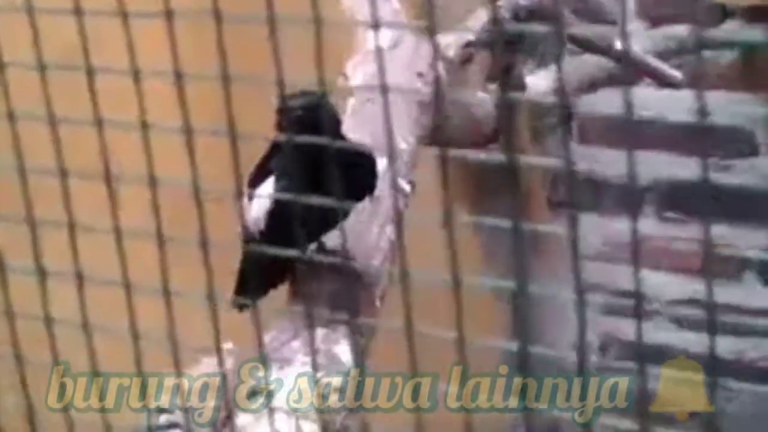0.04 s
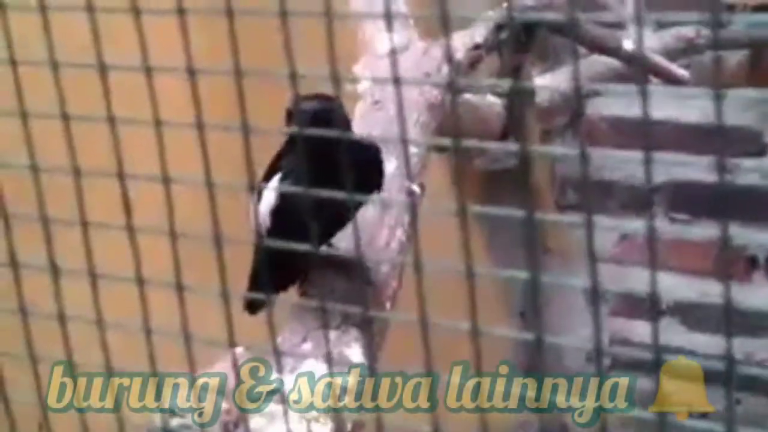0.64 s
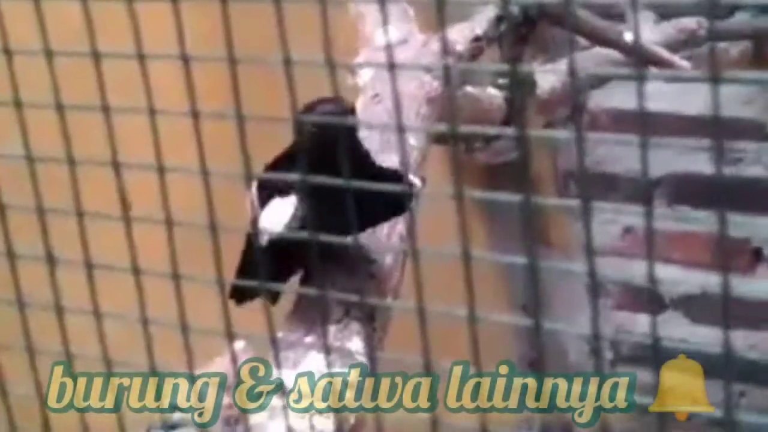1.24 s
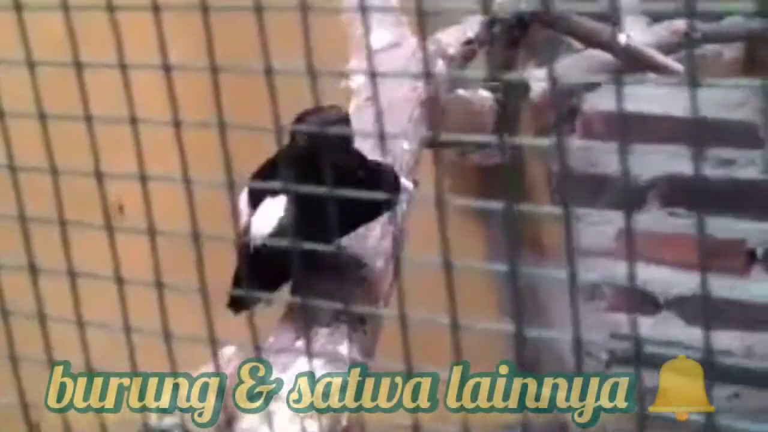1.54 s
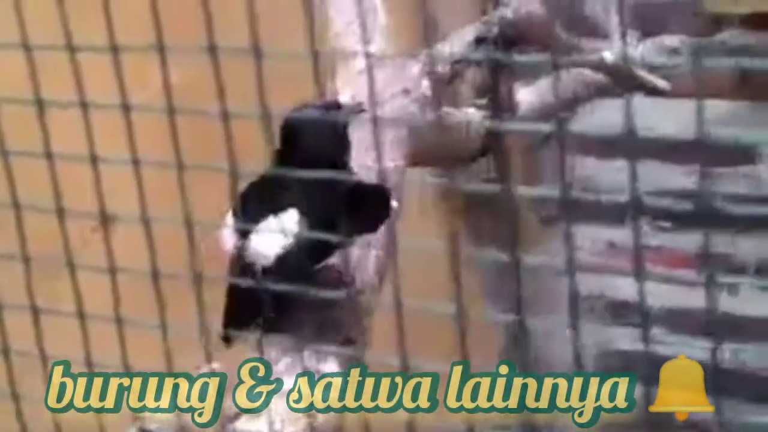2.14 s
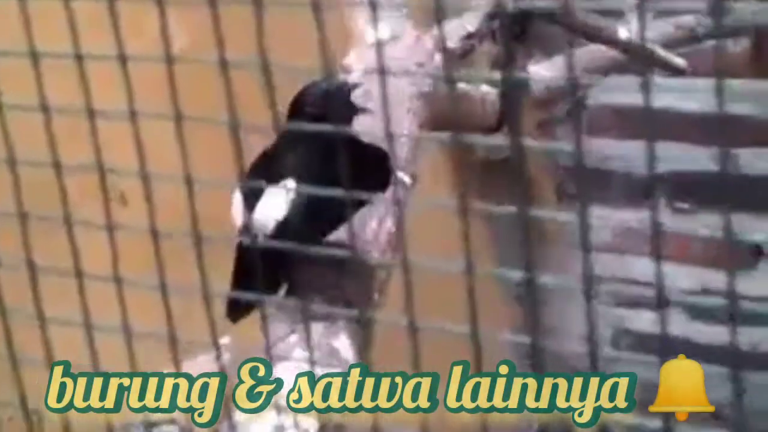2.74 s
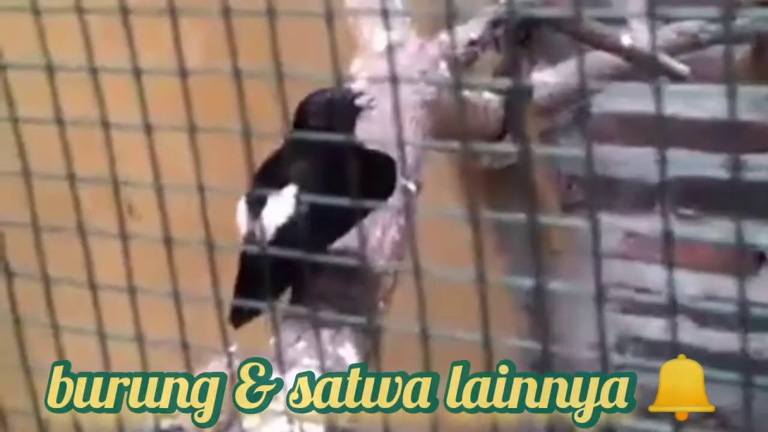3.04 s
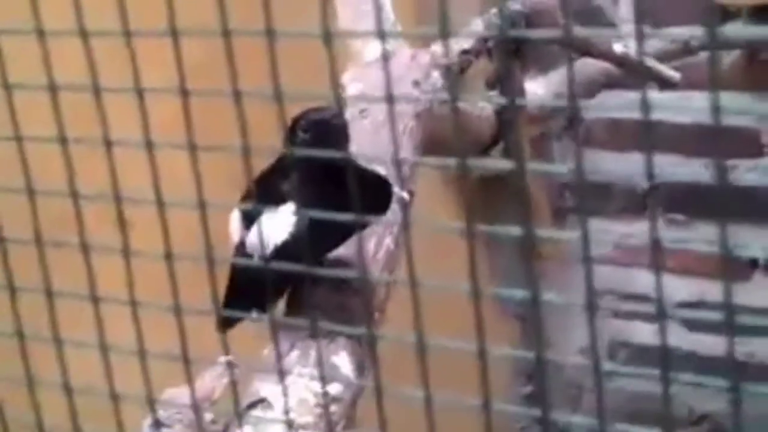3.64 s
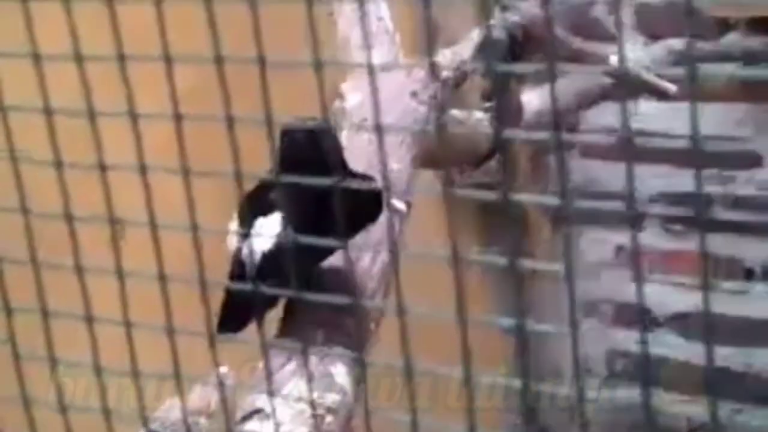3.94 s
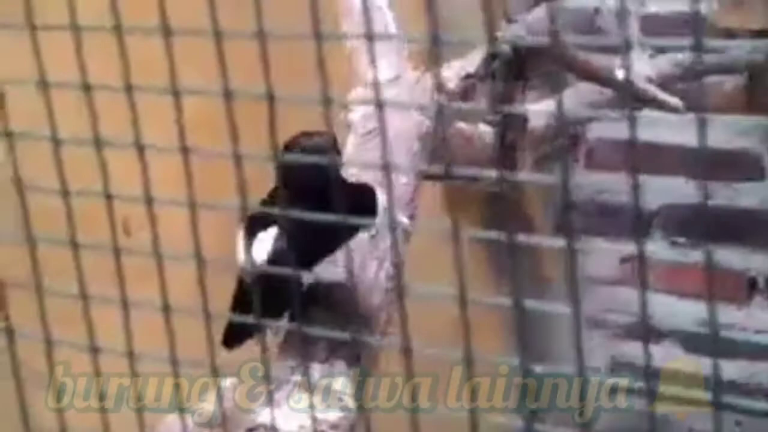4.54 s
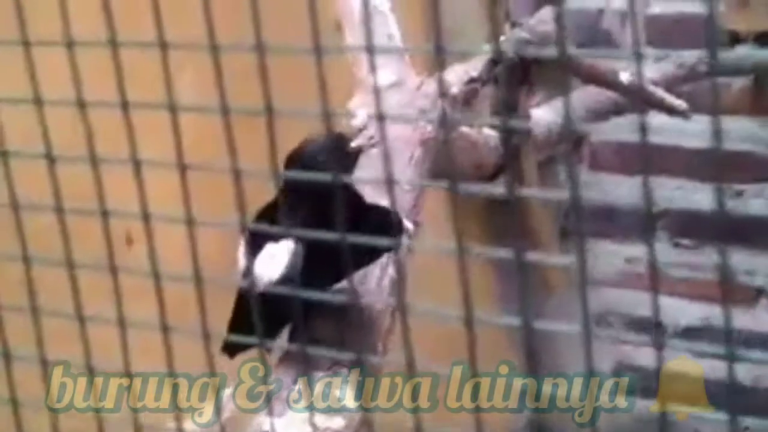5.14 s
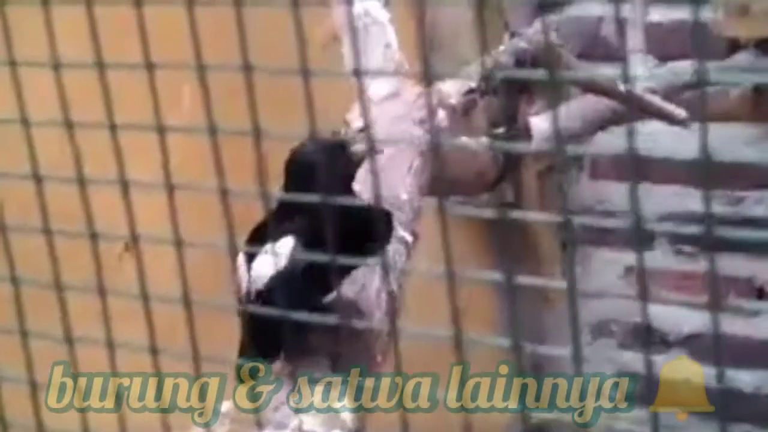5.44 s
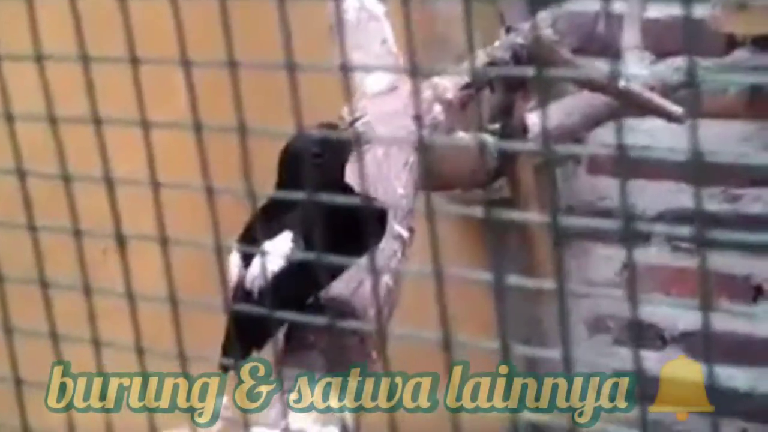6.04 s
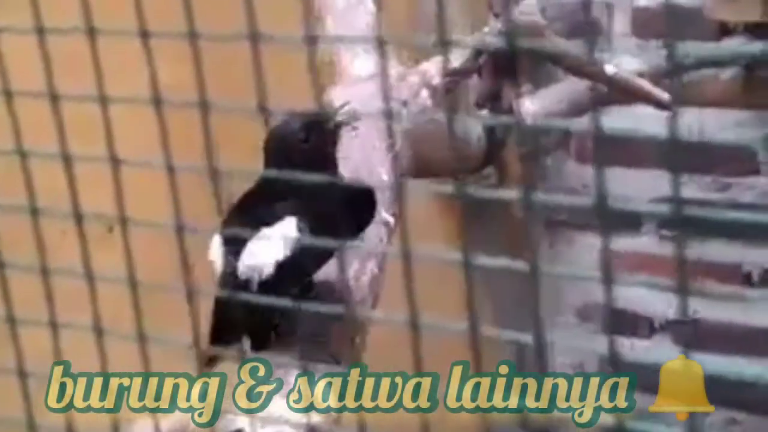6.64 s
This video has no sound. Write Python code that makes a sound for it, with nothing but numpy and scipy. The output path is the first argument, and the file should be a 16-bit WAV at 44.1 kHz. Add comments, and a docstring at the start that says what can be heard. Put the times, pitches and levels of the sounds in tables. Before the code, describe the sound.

A songbird sings quick gliding whistles, sharp whip calls and dry rattling chips in a small aviary, over a faint low rumble.

```python
"""A magpie-robin sings in a small walled aviary, over faint outdoor air, a low rumble and soft low thumps.
After a few faint notes, the two sides of its voice box (the syrinx) whistle gliding, sometimes
overlapping notes, with two whip calls among them. Near 3 s it rattles off dry chips and rasps.
From 4 s it whistles again, with two hooked calls; a second rattle follows, then last whistles at 6.5 s.
Hard walls close by answer every note."""
import sys
import numpy as np
from scipy import signal
from scipy.fft import rfft, irfft
from scipy.io import wavfile
from scipy.ndimage import uniform_filter1d, minimum_filter1d

SR = 44100
rng = np.random.default_rng(int(sys.argv[2]) if len(sys.argv) > 2 else 0)


def master(y):
    """Save y as 16-bit WAV."""
    cut = np.clip(np.atleast_2d(y).T, -1, 1)
    pcm = np.round(cut * 32767)  # scale
    wavfile.write(sys.argv[1], SR, pcm.astype(np.int16))


N = 304290
T = np.arange(N) / SR
TOP_HZ = 15700


def undb(db):
    """Turn decibels into a gain."""
    return 10 ** (np.asarray(db) / 20)


def unit(x):
    """Scale to an average power of 1."""
    return x / np.sqrt(np.mean(x ** 2))


def along(points, hz):
    """Read between (frequency, value) points, giving each octave equal room."""
    f, value = np.transpose(points)
    return np.interp(np.log(np.maximum(hz, 1)), np.log(f), value)


def noise(colour):
    """Noise of power about 1, shaped by (frequency, decibel) points."""
    gain = unit(undb(along(colour, np.fft.rfftfreq(N, 1 / SR))))
    return irfft(rfft(rng.standard_normal(N)) * gain, N)


def smooth(x, seconds):
    """Two running averages round off corners."""
    size = max(1, int(seconds * SR))
    return uniform_filter1d(uniform_filter1d(x, size), size)


def wander(rate):
    """A random drift of size about 1, turning about rate times a second."""
    return unit(smooth(rng.standard_normal(N), 1 / rate))


# Tone of the outdoor air: frequency_hz, gain_db
AIR_COLOUR = [(25, -8.5), (120, -22), (300, -9), (650, -8), (1100, -12.5), (2000, -16.5), (3000, -18.5),
              (7000, -22.5), (9000, -34.5), (16000, -57.5)]
def outdoor_air(level_db=-61.5):
    """A faint, almost steady hush."""
    return noise(AIR_COLOUR) * undb(level_db + 0.23 * wander(4.5))


# Tone of the rumble: frequency_hz, gain_db
RUMBLE_COLOUR = [(20, -13.5), (45, -9.5), (75, -1), (160, -.5), (300, -6), (600, -14), (1000, -23),
                 (2000, -39), (6000, -80)]
# Its slowly changing base level: time_s, level_db
RUMBLE_LEVEL = [(0, -60), (.4, -55), (1.3, -51.5), (2.1, -62), (2.7, -56.5), (3.35, -54.5), (3.85, -54.5),
                (4.3, -53), (4.9, -49), (5.6, -58), (6.1, -63), (6.9, -62)]
def rumble(song, swell_db=-21, uneven_db=1.5):
    """A low rumble that swells with the loudest high notes of the song."""
    treble = signal.sosfilt(signal.butter(4, [4700, 6300], "band", fs=SR, output="sos"), song)
    base = undb(np.interp(T, *np.transpose(RUMBLE_LEVEL)) + uneven_db * wander(18))
    swell_power = np.abs(smooth((undb(swell_db) * treble) ** 2, seconds=.02))
    return noise(RUMBLE_COLOUR) * np.sqrt(base ** 2 + swell_power)


# Soft low thumps: middle_s, level_db, half_width_s
BUMPS = [(1.026, -40.5, 0.039), (1.34, -51.5, .03), (1.662, -40.5, .03), (2.398, -39.5, .05),
         (5.19, -42.5, 0.044), (6.708, -48, 0.021)]
# Their dull tone: frequency_hz, gain_db
BUMP_COLOUR = [(20, -14), (45, -6), (80, -4.5), (140, -15.5), (400, -40), (1500, -88.5)]
def low_bumps():
    """Soft, dull, low thumps sound under some of the loudest notes."""
    push = sum(undb(level_db) * np.exp(-((T - s) / width) ** 2) for s, level_db, width in BUMPS)
    return push * noise(BUMP_COLOUR)


# Echoes off the nearest walls: delay_s, gain_db
WALL_ECHOES = [(.0034, -26.5), (.0087, -14), (0.0115, -8.5)]
# How long the aviary takes to fade by 60 dB: frequency_hz, fade_s
RING_TIMES = [(1000, 0.4), (2500, 0.19), (4000, 0.18), (7000, 0.16), (14000, 0.26)]
def aviary(sound, tail_db, build_s=.01):
    """Hard walls add a few close echoes, then a wash of sound that lasts longest in the lows."""
    t = T[:SR // 2]
    hz = np.fft.rfftfreq(len(t), 1 / SR)
    spectrum = rfft(rng.standard_normal(len(t)))
    centres, fades = np.transpose(RING_TIMES)
    tail = 0
    for share, fade_s in zip(np.eye(len(centres)), fades):
        band = irfft(spectrum * along(np.column_stack([centres, share]), hz), len(t))
        tail = tail + band * undb(-60 * t / fade_s)
    tail *= np.clip(t / build_s, 0, 1)
    response = undb(tail_db) * tail / np.sqrt(np.sum(tail ** 2))
    response[0] += 1  # the direct sound
    for delay_s, echo_db in WALL_ECHOES:
        response[int(delay_s * SR)] += undb(echo_db)
    return signal.fftconvolve(sound, response)[:N]


# One click in the last rattle: middle_s, level_db
CLICKS = [(6.129, -28)]
def click(half_width_s=0.0015):
    """A very short, dry, bright click."""
    push = sum(undb(level_db) * np.exp(-((T - s) / half_width_s) ** 2) for s, level_db in CLICKS)
    return push * unit(np.diff(rng.standard_normal(N + 1)))


def membrane_puffs(slap_hz=480, decay_cycles=0.72):
    """Thin skins in the voice box slap unevenly; each slap lets out a puff of air."""
    cycle = np.cumsum(slap_hz * np.exp(0.26 * wander(300))) / SR % 1
    return unit(np.exp(-cycle / decay_cycles)) * rng.standard_normal(N)


def open_beak(hz, gape_db):
    """A wider beak lets out more of the highest sound: a boost in dB, full from 9 kHz up."""
    return gape_db * np.clip((hz - 8000) / 1000, 0, 1)


def burst_window(start_s, size=SR // 7):
    """The samples around a short burst, and their times counted from its start."""
    span = np.arange(size) + int(start_s * SR) - size // 4
    return span, T[span] - start_s


# Tone the throat gives to chips and rasps: frequency_hz, gain_db
THROAT_COLOUR = [(600, -44), (1000, -27), (1300, -12.5), (1750, -14), (2000, -21), (2650, -11),
                 (3300, -14.5), (4300, -5), (5500, -0.5), (7400, -6), (8600, -24.5), (10800, -33),
                 (13500, -23), (16000, -51.5)]
def throat(burst, beak_hz, gape_db=0, width_hz=1100, ring_db=5):
    """Puffs of air make the throat and beak ring."""
    hz = np.fft.rfftfreq(len(burst), 1 / SR)
    beak_ring = 1 + undb(ring_db) / (1 + 2j * (hz - beak_hz) / width_hz)
    # a tighter throat rings higher and lets out less of the low end
    thinning_db = -90 * max(beak_hz / 6000 - 1, 0) * np.clip(2 - hz / 2000, 0, 1)
    response = beak_ring * undb(along(THROAT_COLOUR, hz) + thinning_db + open_beak(hz, gape_db))
    response /= np.sqrt(np.mean(np.abs(response) ** 2))
    return irfft(rfft(burst) * response, len(burst))


# Rasps: start_s, level_db, length_s, beak_ring_hz, gape_db
RASPS = [ (.18, -29.5, .026, 7300, 6), (0.67, -35, 0.013, 5440, 6.5), (0.685, -24, 0.024, 7200, 13),
         (1.068, -18, 0.041, 6240, 7.5), (1.604, -17, 0.041, 6680, 11.5), (2.667, -24.5, 0.029, 4750, -10),
         (3.597, -23, 0.053, 6750, 4.5), (3.642, -19, .056, 4074, 1.5), (4.12, -41, 0.029, 5190, -12),
         (5.143, -23.5, 0.04, 5850, 13), (5.527, -23.5, 0.054, 4770, 1), (5.578, -13.5, 0.014, 5230, 0), ]
def rasps(puffs, attack_s=0.0055, release_s=0.0023, throb_hz=75, throb_db=3):
    """Longer bursts of puffs that throb as they pass through the throat."""
    out = np.zeros(N)
    for start_s, level_db, length_s, beak_hz, gape_db in RASPS:
        span, age = burst_window(start_s)
        pressure = np.clip(age / attack_s, 0, 1) * np.exp(-np.maximum(age - length_s, 0) / release_s)
        pressure *= undb(level_db + throb_db * np.cos(2 * np.pi * throb_hz * age))
        out[span] += throat(puffs[span] * pressure, beak_hz, gape_db)
    return out


# Dry chips of the rattles: start_s, level_db, length_s, beak_ring_hz
CHIPS = [ (0.25, -25.5, 0.028, 6840), (2.758, -15.5, 0.0056, 5700), (2.833, -17.5, .011, 6050),
         (2.911, -14.5, 0.0064, 6080), (3, -19.5, 0.012, 5930), (3.087, -16.5, 0.0076, 5730),
         (3.181, -19, 0.011, 5600), (3.285, -16, .013, 6250), (3.39, -19.5, 0.011, 6000),
         (5.666, -17, 0.0096, 5700), (5.745, -20.5, .015, 5700), (5.829, -23, 0.017, 5700),
         (5.927, -23, 0.011, 5660), (6.027, -20.5, 0.012, 5900), (6.128, -22, 0.011, 5800),
         (6.259, -23.5, 0.01, 5400), ]
def chips(puffs, attack_s=0.0017, release_s=0.0023, tick_db=-14, lead_s=0.014, tick_fade_s=0.0026):
    """Very short bursts of puffs through the throat, each led in by a softer tick."""
    out = np.zeros(N)
    for start_s, level_db, length_s, beak_hz in CHIPS:
        span, age = burst_window(start_s)
        chip = np.clip(age / attack_s, 0, 1) * np.exp(-np.maximum(age - length_s, 0) / release_s)
        tick = undb(tick_db) * (age > -lead_s) * np.exp(-np.maximum(age + lead_s / 2, 0) / tick_fade_s)
        out[span] += throat(puffs[span] * undb(level_db) * (chip + tick), beak_hz)
    return out


def swell(progress, peak, start_db=-15, end_db=-8.5):
    """Breath in dB as a note goes from 0 to 1: up to its loudest moment, then down."""
    peak = np.clip(peak, .02, .98)
    rise = start_db * (1 - progress / peak) ** 2
    fall = end_db * ((progress - peak) / (1 - peak)) ** 2
    return np.where(progress < peak, rise, fall)


# Arched notes: start_s, length_s, start_hz, middle_hz, end_hz, level_db,
# peak_fraction (how far in it is loudest), overtone_db, rough_fraction (how much the pitch shakes)
ARCHES = [ (0, 0.027, 4000, 4100, 4140, -40.5, 0, -9, 0.03),
          (.166, 0.031, 2840, 2720, 2680, -33.5, 1, 4.5, 0.08),
          (0.695, 0.036, 6400, 6654, 6120, -12.5, 0, -18.5, 0.05),
          (0.947, 0.032, 5880, 6130, 6280, -20, 0.7, -36.5, 0),
          (0.973, 0.08, 6380, 6660, 6810, -6.5, 0.46, -30.5, 0.01),
          (1.221, 0.055, 2780, 3040, 3180, -26, 0.7, -12.5, .01),
          (1.337, 0.075, 3500, 3524, 3634, -8, 0.53, -29, 0.01),
          (1.413, 0.094, 2620, 3012, 2600, -8.5, 0.43, -32.5, .01),
          (1.515, 0.09, 2620, 2790, 2996, -31.5, 1, -9, 0.03),
          (1.794, 0.16, 2023, 2369, 2374, -21.5, 0.66, -20, 0),
          (1.828, 0.089, 2480, 2820, 2835, -33, 0.5, -8, 0.01),
          (2.051, 0.071, 2037, 2204, 2450, -22.5, 1, -27.5, 0),
          (2.115, 0.11, 2425, 2410, 2436, -24, 0.3, -13.5, 0),
          (2.38, 0.11, 3390, 3535, 3533, -9, 0.32, -34, 0),
          (2.479, 0.082, 2600, 3113, 2493, -12, 0.33, -30.5, 0.01),
          (4.031, 0.023, 4230, 3870, 3470, -36, 0.95, -28, 0),
          (4.047, 0.11, 3316, 3352, 3414, -17, 1, -23.5, 0.01),
          (4.115, .042, 2575, 2895, 2820, -34, 0.54, -16, 0),
          (4.123, 0.17, 1976, 1875, 1852, -42.5, 0.58, -6, 0.04),
          (4.152, 0.088, 3497, 3694, 3786, -11.5, 0.16, -30, 0.01),
          (4.178, 0.042, 2630, 2860, 3010, -32.5, 0.06, -18, 0),
          (4.248, 0.023, 2470, 2620, 2620, -33.5, .6, -15, 0),
          (4.327, 0.017, 3900, 3825, 3710, -28.5, 0.6, -25.5, 0.01),
          (4.915, .036, 2657, 2612, 2666, -11, 0.86, -31, 0),
          (4.951, 0.038, 3050, 3002, 2514, -8, 0.26, -31, 0.01),
          (5.006, 0.046, 2810, 3072, 2550, -7.5, 0.31, -29.5, 0.01),
          (5.027, 0.02, 7850, 8070, 8030, -16.5, .9, -25.5, 0),
          (5.11, 0.081, 5840, 5636, 4890, -12, 0.66, -16.5, 0.02),
          (5.132, 0.025, 5350, 5090, 3240, -7.5, 0.24, -19, 0.03),
          (5.297, 0.048, 2544, 2686, 2197, -18, 0.36, -19, 0.02),
          (6.481, 0.1, 5190, 4590, 4434, -31, 0.98, -28, .041),
          (6.545, 0.053, 2750, 2700, 2637, -34.5, 0.51, 3, 0.03),
          (6.561, .11, 3786, 4002, 3878, -9, 0.61, -20, 0),
          (6.669, 0.05, 3900, 3945, 3862, -10.5, 0.5, -25.5, 0), ]
def arched_notes():
    """The pitch bends in one smooth curve through three points."""
    progress = np.linspace(0, 1, 50)
    for start_s, length_s, *pitches, level_db, peak, overtone_db, rough in ARCHES:
        hz = np.polyval(np.polyfit([0, .5, 1], pitches, 2), progress)
        yield start_s + progress * length_s, hz, level_db + swell(progress, peak), overtone_db, rough


# Falling notes: start_s, length_s, start_hz, target_hz, settle_s, level_db,
# peak_fraction, overtone_db, rough_fraction
SLURS = [ (1.28, 0.062, 4060, 3060, 0.0064, -7.5, 0.38, -29.5, 0.01),
         (1.35, .09, 2630, 2073, 0.08, -37.5, .4, -7.5, 0.02),
         (1.698, .062, 2440, 2320, 0.024, -35.5, 0, -29, 0.04),
         (2.327, 0.02, 3550, 3250, .02, -19, 0.67, -32.5, 0.01),
         (2.346, 0.04, 3160, 3059, 0.0071, -7, .45, -30.5, 0.02),
         (5.044, 0.11, 7920, 6476, 0.11, -8.5, 0.47, -27, 0.01),
         (5.192, 0.031, 6430, 4570, 0.049, -5.5, 0.22, -25, 0.02),
         (5.226, 0.065, 5560, 4585, .04, -16.5, 0.1, -20, 0),
         (5.361, 0.11, 6450, 2430, 0.044, -17, 0.41, -25, 0.03), ]
def falling_notes():
    """The pitch drops fast, then more slowly as it heads for its target."""
    progress = np.linspace(0, 1, 50)
    for start_s, length_s, start_hz, target_hz, settle_s, level_db, peak, overtone_db, rough in SLURS:
        age = progress * length_s
        hz = target_hz + (start_hz - target_hz) * np.exp(-age / settle_s)
        yield start_s + age, hz, level_db + swell(progress, peak), overtone_db, rough


# Whip calls: start_s, gain_db
WHIPS = [(1.061, -0.5), (1.605, 0)]
# The rising side: age_s, pitch_hz, level_db
WHIP_FLICK = [(0, 3683, -25), (.008, 5320, -13), (.014, 7500, -16.5), (.022, 8420, -18.5)]
# The falling side: age_s, pitch_hz, level_db
WHIP_FALL = [(.014, 3653, -26), (.021, 5240, -2.5), (.027, 4606, -16), (.035, 5200, -2.5),
             (.047, 4450, -10), (.061, 3780, -13.5), (.08, 3366, -18.5), (.104, 3047, -16.5)]
def whip_calls():
    """Both sides of the voice box at once: one flicks upward, the other shakes twice and falls."""
    for start_s, gain_db in WHIPS:
        for shape, overtone_db, rough in (WHIP_FLICK, -8, 0.055), (WHIP_FALL, -20, 0.032):
            age, hz, level_db = np.transpose(shape)
            yield start_s + age, hz, level_db + gain_db, overtone_db, rough


# Hooked calls: start_s, stretch_factor, gain_db
HOOKS = [(4.344, 0.97, 0.5), (4.631, .92, -1)]
# One hook before stretching: age_s, pitch_hz, level_db
HOOK_SHAPE = [(0, 3110, -17), (.04, 3309, -10.5), (.075, 3362, -13), (.087, 3246, -11),
              (0.098, 2634, -12.5), (.119, 2155, -22), (.157, 2034, -31), (0.198, 2162, -26.5)]
def hooked_calls(overtone_db=-27, rough=.003):
    """The bird holds a note, then lets it drop and die away."""
    age, hz, level_db = np.transpose(HOOK_SHAPE)
    for start_s, stretch, gain_db in HOOKS:
        yield start_s + stretch * age, hz, level_db + gain_db, overtone_db, rough


# How well overtones leave the beak: frequency_hz, gain_db
BEAK_COLOUR = [(4000, -9.5), (4900, -8.5), (6100, 2.5), (7200, 3.5), (8100, -15), (8900, -30),
               (10200, -9.5), (11500, -20.5), (12600, -18), (14500, -16.5), (16000, -23.5)]
# Air hissing past the edges of the open beak: frequency_hz, gain_db
HISS_COLOUR = [(6000, -41.5), (8800, -15), (10500, -4), (11700, -8.5), (13800, -1.5), (15500, 4)]
# Boost to the hiss and highest overtones as the beak opens: time_s, gape_db
BEAK_OPENING = [(0, 7), (1, 3.5), (1.1, 1), (2.2, 2.5), (2.45, -2), (4.1, -11.5), (4.38, -19), (4.47, 9.5),
                (4.66, -13), (4.76, 14), (4.95, 3), (5.3, -6), (5.45, -18), (6.55, -23.5)]
def whistles(notes, voice_db=-3.5, flutter_db=2.5, hiss_db=-52, edge_s=0.0045, fray_radians=.3):
    """Each note is one side of the voice box: tension sets the pitch, air pressure the loudness."""
    out = np.zeros(N)
    jitter, flutter, closure = wander(900), wander(210), wander(500)
    hiss = noise(HISS_COLOUR)
    for times, pitch_hz, level_db, overtone_db, rough in notes:
        span = (T > times[0] - edge_s) & (T < times[-1] + edge_s)
        t = T[span]
        glide = smooth(np.interp(t, times, pitch_hz), seconds=.0025)
        hz = glide * (1 + rough * jitter[span])
        phase = 2 * np.pi * np.cumsum(hz) / SR
        tone = np.sin(phase)
        gape_db = np.interp(t, *np.transpose(BEAK_OPENING))
        slide = np.minimum(.08 * SR * np.abs(np.gradient(np.log(glide))), 1) ** 2
        for k in range(2, 8):
            beak_db = along(BEAK_COLOUR, k * hz) + open_beak(k * hz, gape_db)
            # the skins close unevenly, fraying high overtones most, above all in fast slides
            fray = ((k - 2) * fray_radians + k * slide) * closure[span]
            tone += (k * hz < TOP_HZ) * undb(overtone_db + beak_db) * np.sin(k * phase + fray)
        tone += undb(hiss_db + gape_db) * hiss[span]
        pressure = undb(np.interp(t, times, level_db) + flutter_db * flutter[span] + voice_db)
        fade_in = np.clip((t - times[0]) / edge_s + .5, 0, 1)
        fade_out = np.clip((times[-1] - t) / edge_s + .5, 0, 1)
        out[span] += np.sqrt(2) * tone * pressure * fade_in * fade_out
    return out


def scene(side_db=-13):
    """Both ears hear nearly the same; only the highs of the echoes differ a little."""
    song = whistles([*arched_notes(), *falling_notes(), *whip_calls(), *hooked_calls()])
    puffs = membrane_puffs()
    bird = song + chips(puffs) + rasps(puffs)
    echoes = aviary(bird, tail_db=-28.5) - bird
    side = signal.sosfilt(signal.butter(8, 5500, "high", fs=SR, output="sos"), echoes)
    middle = aviary(bird, tail_db=-5) + click() + outdoor_air() + rumble(song) + low_bumps()
    return middle + undb(side_db) * side * np.array([[1], [-1]])


def record(dry, ceiling=1.0):
    """A limiter turns down the very loudest peaks; a steep filter cuts the highest treble."""
    gain = ceiling / np.maximum(np.abs(dry).max(axis=0), ceiling)
    limited = dry * smooth(minimum_filter1d(gain, size=SR // 250), seconds=.002)
    return signal.sosfilt(signal.ellip(12, .1, 100, TOP_HZ, fs=SR, output="sos"), limited)


dry = scene()
out = record(dry)
master(out)
```